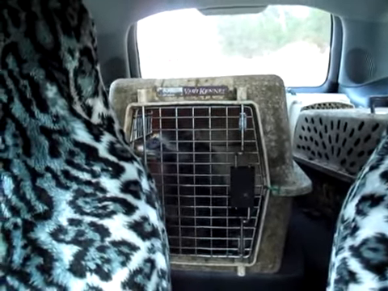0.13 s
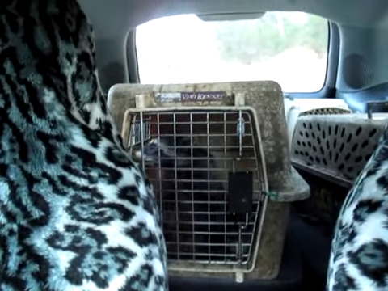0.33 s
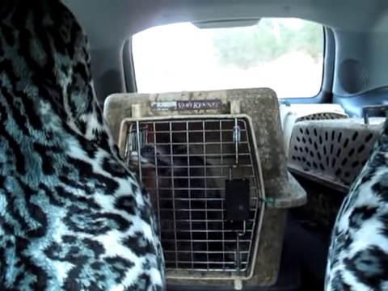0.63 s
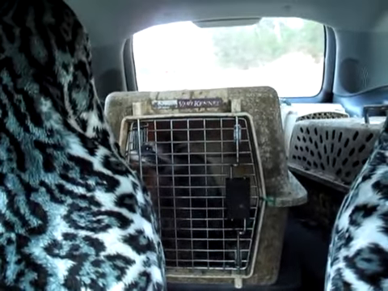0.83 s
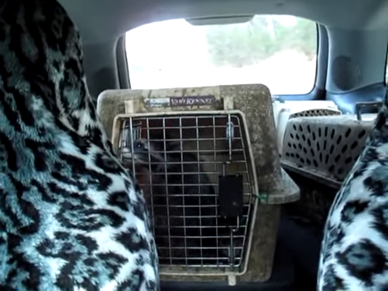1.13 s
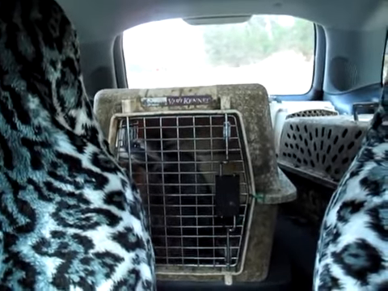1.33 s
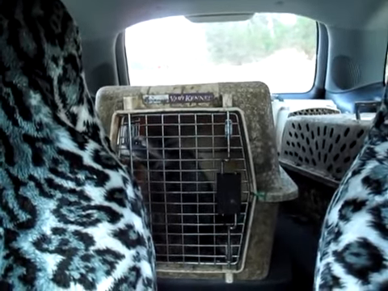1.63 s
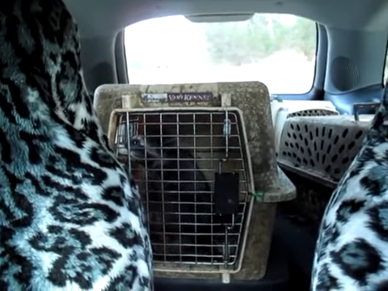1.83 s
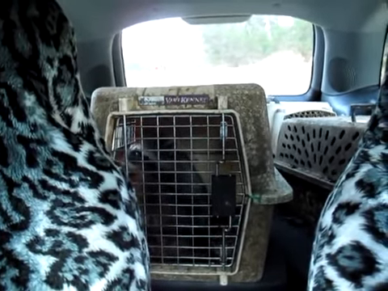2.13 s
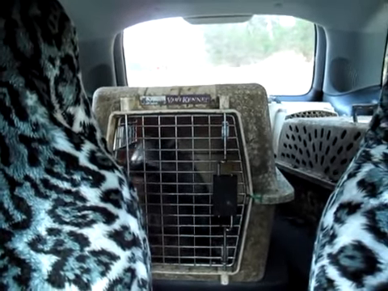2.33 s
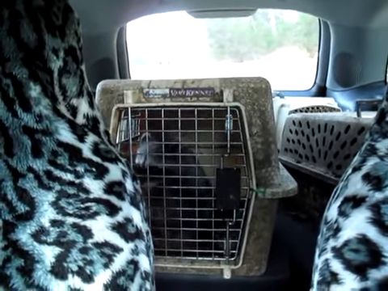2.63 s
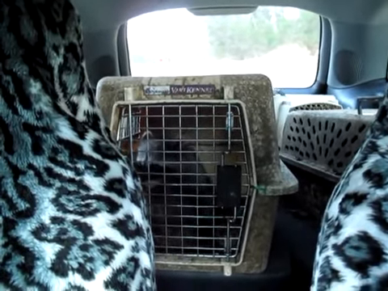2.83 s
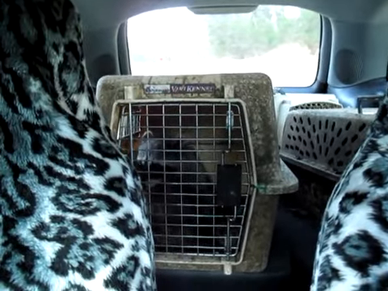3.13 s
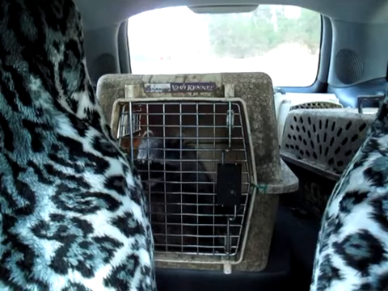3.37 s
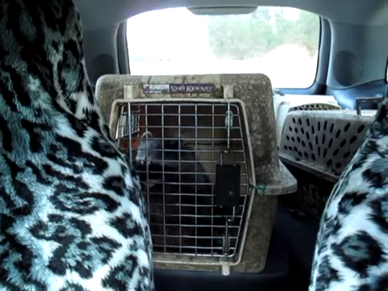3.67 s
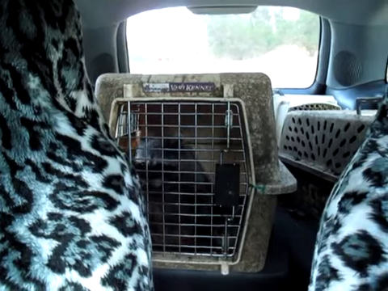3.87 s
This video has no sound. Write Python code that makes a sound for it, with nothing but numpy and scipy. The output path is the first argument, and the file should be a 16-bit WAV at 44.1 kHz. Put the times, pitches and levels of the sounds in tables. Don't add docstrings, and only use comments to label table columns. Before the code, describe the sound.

Two young raccoons chitter and squeal hoarsely from a plastic carrier in an idling car

```python
import sys
import numpy as np
from scipy import signal
from scipy.fft import rfft, irfft
from scipy.io import wavfile
from scipy.ndimage import uniform_filter1d

SR = 44100
rng = np.random.default_rng(int(sys.argv[2]) if len(sys.argv) > 2 else 0)


def store_wav(level_fs):
    pcm = np.round(np.clip(np.atleast_2d(level_fs), -1, 1) * 32767)
    wavfile.write(sys.argv[1], SR, pcm.T.astype(np.int16))


def volts_from_db(level):
    exponent = np.asarray(level, float) / 20
    return 10 ** exponent


N = 176400

# multiple of the idle rate, level in dB.
IDLE_ORDERS = [(1, -51), (2, -46.5), (3, -63), (4, -60.5)]
# frequency in Hz, level in dB per Hz.
CABIN_COLOUR = [(25, -28.5), (53, -5), (158, -15), (300, -12.5), (635, -24), (1600, -32), (2500, -38),
                (10000, -49.5)]
# start in seconds, level in dB, pitch in Hz.
BUMPS = [
    (.88, -38, 118),
    (2.95, -46, 95),
    (3.87, -44, 100),
]
# start in seconds, level in dB, hold in seconds.
RUSTLES = [(0.734, -51.5, 0.1), (0.951, -40.5, 0.014), (1.976, -40.5, 0.025), (2.058, -39, 0.054),
           (2.195, -50, 0.013), (2.331, -53.5, 0.011), (2.417, -48.5, 0.071), (2.533, -49.5, 0.0038),
           (2.808, -55.5, 0.0082), (3.36, -53, 0.0047), (3.494, -47.5, 0.43), (1.016, -48, 0.52)]
# frequency in Hz, level in dB per Hz.
RUSTLE_COLOUR = [(290, -36), (500, -13), (822, -17), (1250, 4.5), (6810, 1), (9130, 5), (10500, 1),
                 (13600, -13), (22000, -120)]
# frequency in Hz, width in Hz, level in dB.
CARRIER_MODES = [(925, 130, 2), (1155, 130, 1), (1535, 130, 5), (1822, 120, 8), (2300, 180, 2),
                 (2470, 180, 2), (3350, 220, 3)]

# frequency in Hz, level in dB.
LOW_THROAT = [(800, -8), (1800, -0.5), (2500, -12), (3000, 5), (3400, -21), (4000, -16), (4700, -12),
              (9500, -15.5)]
RAISED_THROAT = [(900, -6), (1850, -14.5), (2250, -5), (3200, -3), (3700, -29), (4300, -9), (7000, -19.5),
                 (9500, -15)]
STUTTER_THROAT = [(900, -2.5), (1200, -16.5), (2300, -14), (3400, -22), (4000, -19.5), (5500, -23),
                  (7000, -22), (9500, -26.5)]
SQUEAL_THROAT = [(900, -8.5), (1500, -13), (2500, -1.5), (3500, -6.5), (4200, -15), (5000, -24),
                 (8500, -15), (10500, -20)]
# frequency in Hz, level in dB.
AIR_TILT = [(600, -26), (1500, -4), (3300, -2), (4000, -11), (4700, 1), (6200, 2), (7000, -4), (9000, 8)]

# start in seconds, level in dB, pitch in Hz, hold in seconds.
CHITTER = [(-.018, -24.5, 835, .027), (.068, -27.5, 777.4, 0.01944), (.135, -37, 732.5, .053),
           (.27, -29.5, 740, .08), (.91, -25.5, 830, 0.0059), (.981, -23.5, 925, .005),
           (1.056, -25.5, 880, .011), (1.13, -28, 950, 0.017), (1.203, -22, 919, 0.01307),
           (1.286, -24.5, 914.3, .016), (1.365, -25, 870, 0.01813), (1.451, -24.5, 900, 0.0063),
           (1.519, -25, 893, 0.01177), (1.602, -30.5, 916, .016), (1.675, -29, 921.7, 0.01142),
           (1.747, -20.5, 926.4, 0.0117), (1.826, -23, 921.3, 0.0209), (1.925, -22.5, 846.4, 0.0196)]
RASPS = [
    (.857, -37, 780, .042),
    (.95, -47, 900, .015),
]
CHITTER_RAISED = [
    (3.432, -37.5, 911, .013),
    (3.495, -30.5, 1026, 0.0078),
    (3.552, -27.5, 1073, 0.013),
    (3.616, -25.5, 1075, 0.017),
]
CHITTER_RISING = [
    (3.675, -22, 1090, .016),
    (3.734, -25.5, 1085, 0.023),
    (3.806, -23.5, 1084, .016),
    (3.872, -22, 1060, 0.024),
    (3.941, -24.5, 1044, 0.037),
]
STUTTER = [
    (1.098, -40, 1093, 0.02),
    (1.128, -25, 1084, 0.012),
    (1.17, -25, 1116, 0.0067),
    (1.21, -24, 1165, 0.0081),
    (1.255, -24, 1142, 0.017),
    (1.3, -24.5, 1090, 0.012),
    (1.343, -20.5, 1208, 0.0092),
    (1.385, -24.5, 1103, 0.011),
]

# time in seconds, pitch in Hz, level of the 2nd harmonic in dB.
YELP_FIRST = [(.074, 1287, -38), (.086, 1395, -25.5), (.1, 1575, -29.5), (.112, 1503, -33)]
SQUEAL_OPENING = [(0.133, 1231, -17), (0.149, 1389, -26), (0.161, 1429, -23.5), (0.201, 1391, -25.5),
                  (0.229, 1347, -24.5), (0.241, 1231, -36), (0.257, 1238, -36.5), (0.275, 1227, -28.5)]
SQUEAL_FIRST = [(0.281, 1223, -29.5), (0.304, 1237, -30), (0.398, 1176, -31), (0.46, 1098, -34),
                (0.51, 1121, -35), (0.545, 1283, -27), (0.588, 1158, -30.5), (0.684, 1262, -30),
                (0.73, 1012, -47)]
SQUEAL_RISE = [(1.492, 1150, -40.5), (1.52, 1151, -30.5), (1.53, 1384, -23.5), (1.54, 1535, -18.5),
               (1.548, 1453, -22.5), (1.556, 1358, -28)]
SQUEAL_PEAK = [(1.562, 1477, -30), (1.58, 1614, -18), (1.596, 1795, -23.5), (1.61, 1828, -29),
               (1.636, 1771, -26), (1.646, 1646, -18), (1.664, 1638, -21), (1.68, 1617, -28),
               (1.745, 1302, -21)]
SQUEAL_FALL = [(1.748, 1279, -25), (1.758, 1241, -24.5), (1.8, 1213, -27), (1.834, 1144, -34),
               (1.914, 1114, -29.5), (1.946, 1017, -37.5), (1.965, 927.2, -44)]
YELP_LAST = [(3.753, 1176, -45), (3.768, 1308, -26.5), (3.783, 1316, -23), (3.797, 1305, -33.5)]
SQUEAL_LAST = [(3.822, 1143, -21), (3.838, 1286, -26), (3.862, 1182, -30), (3.884, 1223, -27),
               (3.9, 1374, -27), (3.916, 1369, -18), (3.928, 1192, -26.5), (3.974, 1382, -25),
               (4.0, 1390, -35)]
# time in seconds, roughness from 0 to 1.
HOARSE = [(.09, .7), (.14, .4), (.2, .3), (.3, .4), (.4, .22), (.51, .22), (.55, .55), (.59, .2),
          (.65, .22), (.72, .5), (1.5, .3), (1.54, .65), (1.6, .6), (1.67, .65), (1.71, .3), (1.9, .3),
          (1.95, .6), (3.8, .3)]
# time in seconds,
# level change in dB, half width in seconds.
CATCHES = [(.137, -14.5, 0.0078), (0.171, -7, 0.0023), (0.206, -1, 0.003), (.272, -1, 0.0025),
           (0.382, -2.5, 0.0024), (0.517, -1.5, 0.0044), (.562, -11, 0.0035), (1.524, -21, 0.0033),
           (1.557, 1.5, 0.0077), (1.628, 13.5, .004), (1.691, -9, 0.0036), (1.744, -6.5, 0.0082),
           (1.861, -3.5, 0.0051), (1.894, -15, 0.0027), (1.931, -6, 0.0046), (3.857, -6, .003),
           (3.866, -3, 0.0024), (3.924, -3, 0.0021), (3.947, -14, 0.0037)]


def table_db(hz, table):
    table = np.array(table, float)
    return np.interp(np.log(hz + 1), np.log(table[:, 0]), table[:, 1])


def noise(table):
    colour = volts_from_db(table_db(np.fft.rfftfreq(N, 1 / SR), table))
    x = irfft(rfft(rng.standard_normal(N)) * colour, N)
    return x / x.std()


def walk(rate):
    k = max(int(SR / rate), 2)
    x = uniform_filter1d(uniform_filter1d(rng.standard_normal(N), k), k)
    return x / x.std()


def swell(t, hold, attack, release):
    rise = np.clip(t / attack, 0, 1) ** 2
    return rise * np.exp(-np.clip(t - attack - hold, 0, None) / release)


def ring(x):
    return sum(volts_from_db(db) * signal.lfilter(*signal.iirpeak(hz, hz / width, SR), x)
               for hz, width, db in CARRIER_MODES)


def idling_car():
    idle_hz = 22.36
    phase = 2 * np.pi * np.cumsum(idle_hz * (1 + 0.013 * walk(5.2))) / SR
    hum = sum(np.sqrt(2) * volts_from_db(db + 0.5 * walk(1.6)) * np.cos(k * phase) for k, db in IDLE_ORDERS)
    throb = 1 + 0.13 * np.cos(2 * phase)
    hiss = volts_from_db(-45 + 0.8 * walk(16.0)) * throb * noise(CABIN_COLOUR)
    return hum + hiss + volts_from_db(-11.5) * ring(hiss)


def camera_whine(t):
    return np.sqrt(2) * volts_from_db(-52.5 + 0.31 * walk(23)) * np.cos(2 * np.pi * 5879.5 * t)


def floor_bumps(t):
    return sum(volts_from_db(db) * swell(t - start, 0.017, 0.013, 0.038) * np.sin(2 * np.pi * hz * t)
               for start, db, hz in BUMPS)


def sniffs_and_rustles(t):
    swells = sum(volts_from_db(db) * swell(t - start, hold, 0.019, 0.034) for start, db, hold in RUSTLES)
    return swells * volts_from_db(0.55 * walk(150)) * noise(RUSTLE_COLOUR)


def carrier_and_cabin(x):
    echo_t60_s = 0.058
    x = signal.sosfilt(signal.butter(4, 720, "high", fs=SR, output="sos"), x)
    x = x + volts_from_db(-2) * ring(x)
    age = np.arange(SR // 4) / SR
    tail = rng.standard_normal(len(age)) * volts_from_db(-60 * age / echo_t60_s) * (age > .002)
    tail = tail / np.sqrt(np.sum(tail ** 2))
    return x + volts_from_db(-4.5) * signal.fftconvolve(x, tail)[:N]


def voice(hz, gain, rough, throat, breath_db):
    jitter = .032 * rough * walk(400)
    wobble = .016 * rough * walk(73.87)
    phase = 2 * np.pi * np.cumsum(hz * (1 + jitter + wobble)) / SR
    on = gain > 1e-5
    tone = np.zeros(N)
    for k in range(1, 14):
        level_db = table_db(k * hz[on], throat) + 3.2 * walk(68)[on]
        partial = np.cos(k * phase[on] + rng.uniform(0, 2 * np.pi))
        tone[on] += volts_from_db(level_db) * (k * hz[on] < 11000) * partial
    breath = [(f, table_db(f, throat) + table_db(f, AIR_TILT)) for f in np.geomspace(300, 11000, num=40)]
    air = volts_from_db(breath_db) * rough * (1 + .5 * np.cos(phase)) * noise(breath)
    shimmer = volts_from_db(3.5 * np.minimum(rough, 1) * walk(320))
    return gain * shimmer * (np.sqrt(2) * tone + air)


def notes(table, t, attack, rise):
    release_s, sag_per_s = 0.0037, 5
    hz, gain = np.full(N, 1. * table[0][2]), np.zeros(N)
    for start, db, pitch, hold in table:
        age = t - start
        sag = sag_per_s * np.clip(age - attack - hold, 0, .03)
        bend = rise * (np.tanh(age / (attack + hold / 2)) - .7)
        hz = np.where(age >= 0, pitch * (1 + bend - sag), hz)
        gain = np.maximum(gain, volts_from_db(db) * swell(age, hold, attack, release_s))
    return hz, gain


def low_animal(t):
    chitter = volts_from_db(-9.0) * voice(*notes(CHITTER, t, .013, .09), .8, LOW_THROAT, 5)
    rasps = volts_from_db(-11.5) * voice(*notes(RASPS, t, 0.0017, .09), 1.6, LOW_THROAT, 5)
    raised = volts_from_db(-0.5) * voice(*notes(CHITTER_RAISED, t, .0035, 0.0314), .45, RAISED_THROAT, 3)
    rising = volts_from_db(-3.5) * voice(*notes(CHITTER_RISING, t, 0.012, .17), .8, RAISED_THROAT, 3)
    return chitter + rasps + raised + rising


def stutter(t):
    return voice(*notes(STUTTER, t, 0.01152, .08), .6, STUTTER_THROAT, 3.5)


def squeals(t):
    edge_s = 0.0031
    calls = (YELP_FIRST, SQUEAL_OPENING, SQUEAL_FIRST, SQUEAL_RISE,
             SQUEAL_PEAK, SQUEAL_FALL, YELP_LAST, SQUEAL_LAST)
    rows = np.concatenate(calls)
    hz = np.interp(t, rows[:, 0], rows[:, 1])
    db = np.interp(t, rows[:, 0], rows[:, 2])
    on = np.max([swell(t - c[0][0], c[-1][0] - c[0][0], edge_s, edge_s) for c in calls], axis=0)
    catch_db = sum(depth_db * np.exp(-((t - s) / width) ** 2) for s, depth_db, width in CATCHES)
    gain = on * volts_from_db(db + catch_db - table_db(2 * hz, SQUEAL_THROAT) + 1.0)
    rough = np.interp(t, *np.array(HOARSE).T)
    return voice(hz, gain, rough, SQUEAL_THROAT, 0.74)


def scene():
    t = np.arange(N) / SR
    background = idling_car() + camera_whine(t)
    movement = floor_bumps(t) + sniffs_and_rustles(t)
    calls = low_animal(t) + stutter(t) + squeals(t)
    return (background + movement + carrier_and_cabin(calls))[None]


def roll_off(x):
    return signal.sosfilt(signal.butter(12, 11590, fs=SR, output="sos"), x)


def record(dry):
    limit_db, slope, settle_s = -23.5, .85, .028
    keep = np.exp(-1 / (settle_s * SR))
    shrill = signal.sosfilt(signal.butter(4, 3200, "high", fs=SR, output="sos"), dry)
    power = signal.lfilter([1 - keep], [1, -keep], uniform_filter1d(shrill ** 2, size=600))
    over_db = 10 * np.log10(power + 1e-12) - limit_db
    x = dry * volts_from_db(-slope * np.clip(over_db, 0, None))
    x = signal.sosfilt(signal.cheby1(16, .5, 10250, fs=SR, output="sos"), x)
    return roll_off(x)


dry = scene()
out = record(dry)
store_wav(out)
```